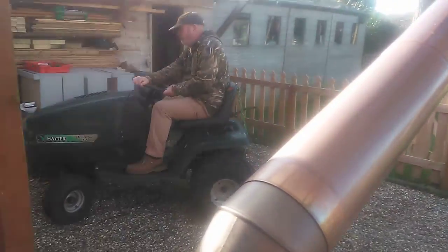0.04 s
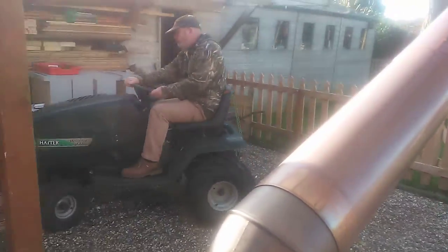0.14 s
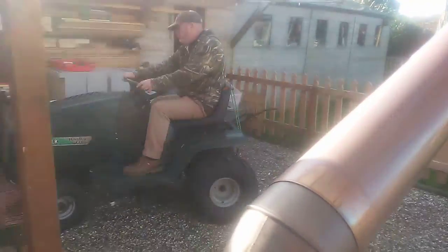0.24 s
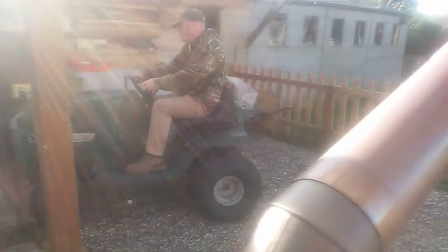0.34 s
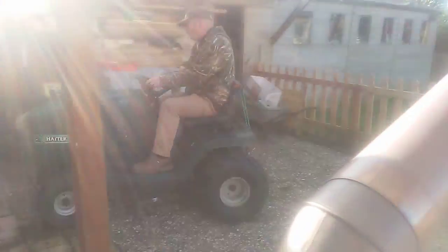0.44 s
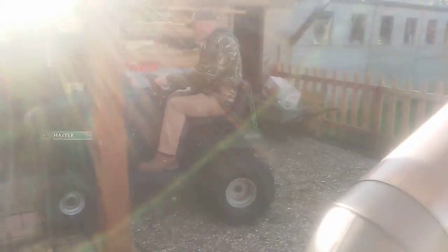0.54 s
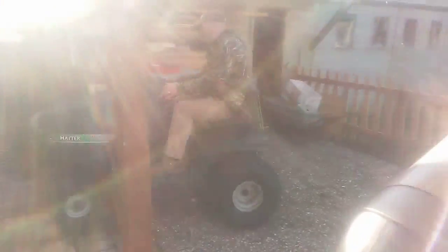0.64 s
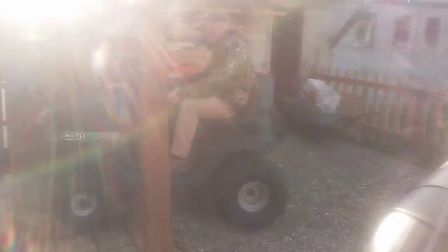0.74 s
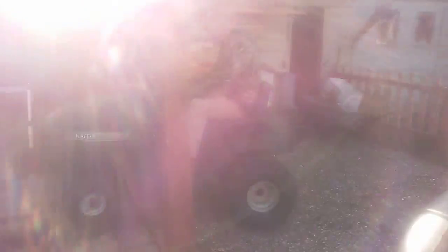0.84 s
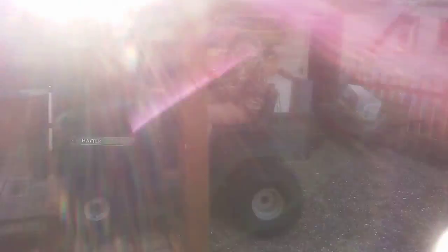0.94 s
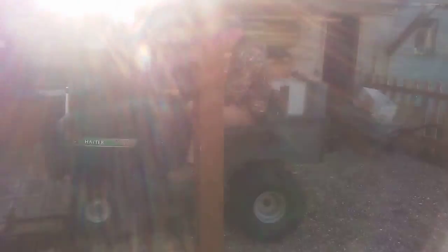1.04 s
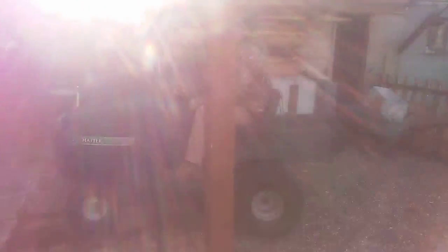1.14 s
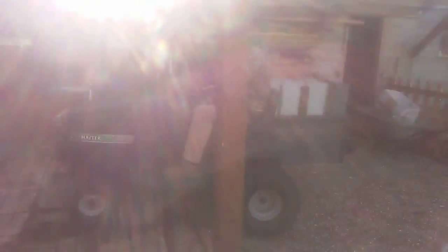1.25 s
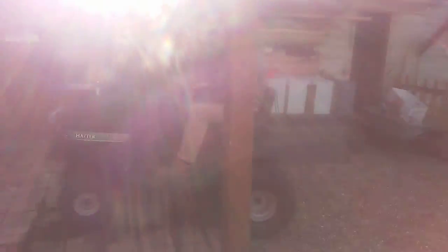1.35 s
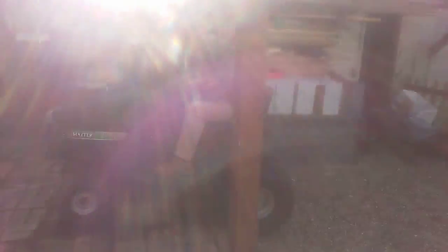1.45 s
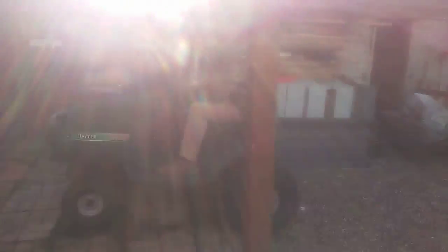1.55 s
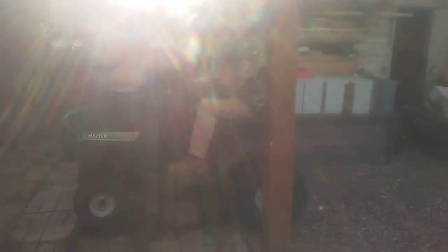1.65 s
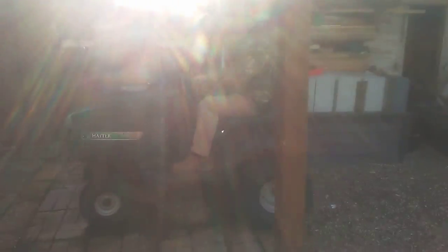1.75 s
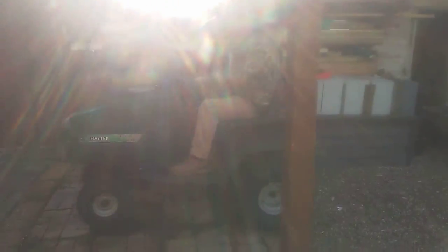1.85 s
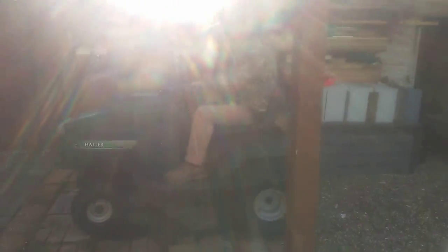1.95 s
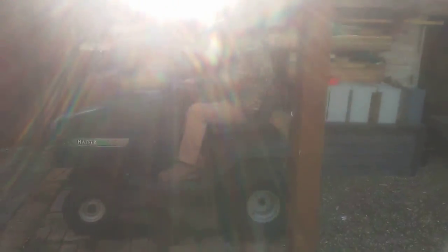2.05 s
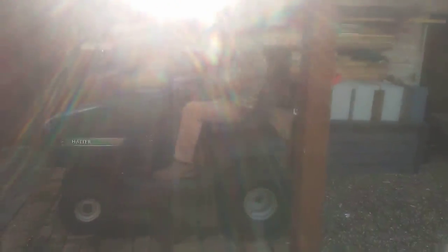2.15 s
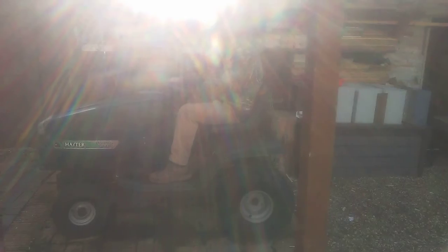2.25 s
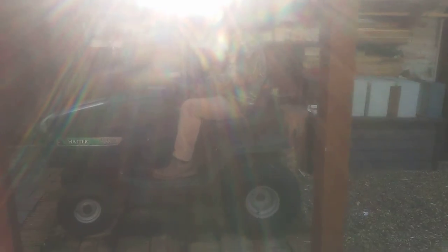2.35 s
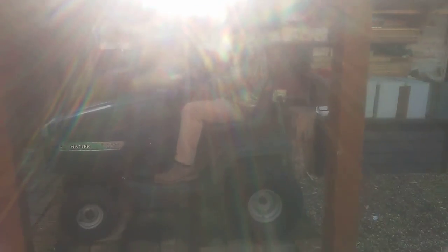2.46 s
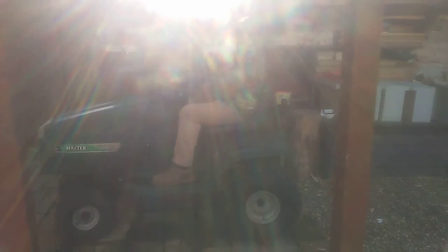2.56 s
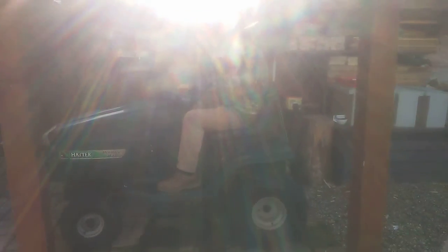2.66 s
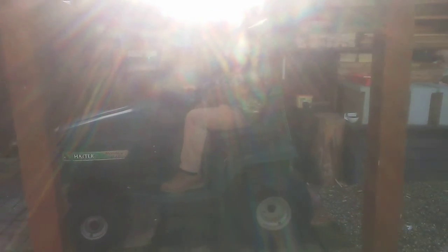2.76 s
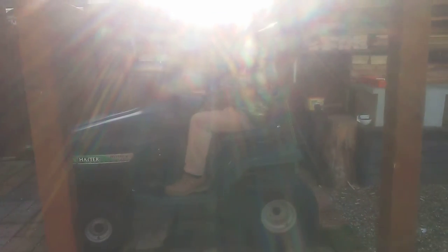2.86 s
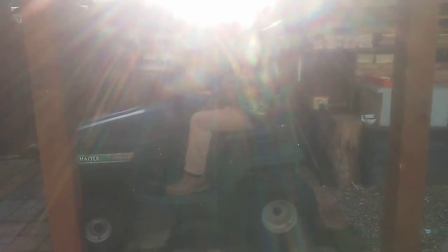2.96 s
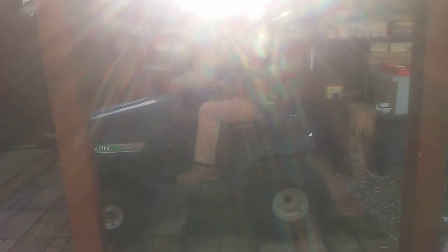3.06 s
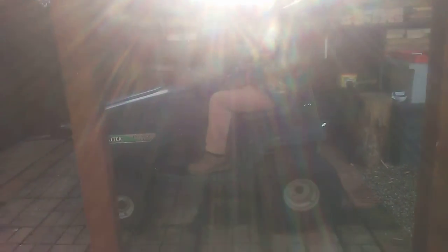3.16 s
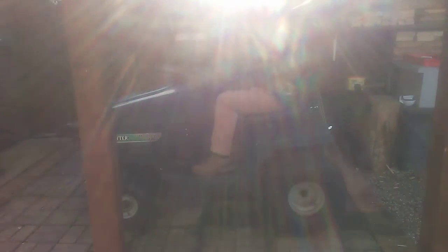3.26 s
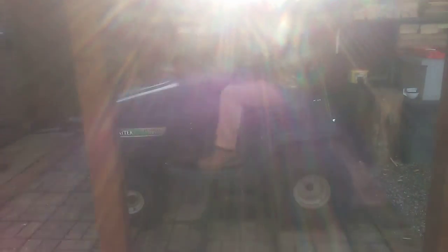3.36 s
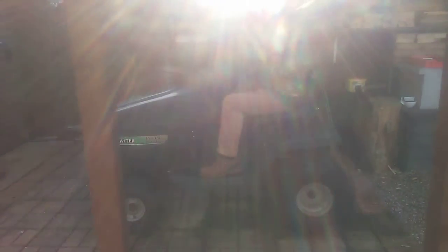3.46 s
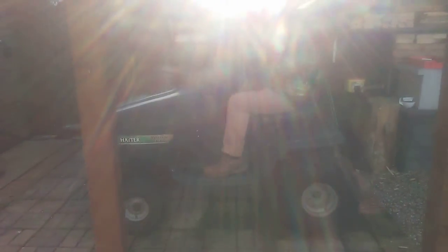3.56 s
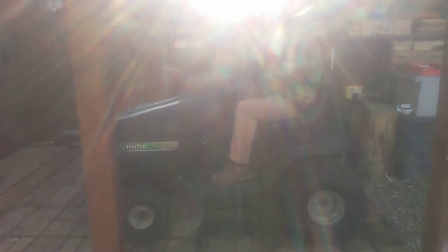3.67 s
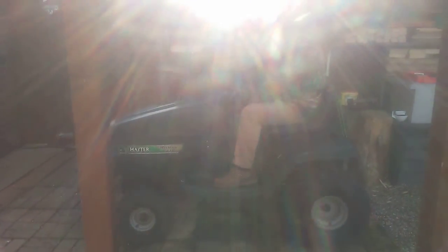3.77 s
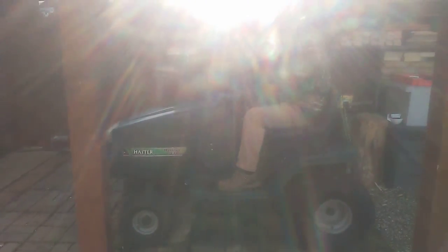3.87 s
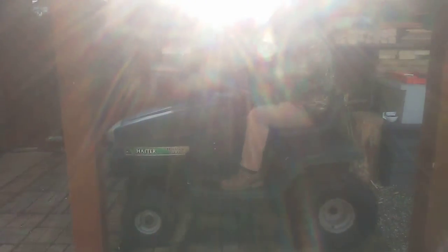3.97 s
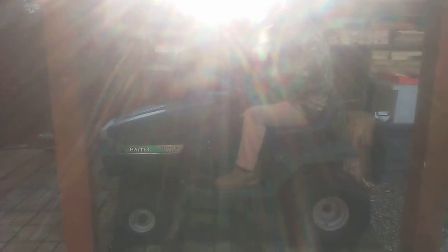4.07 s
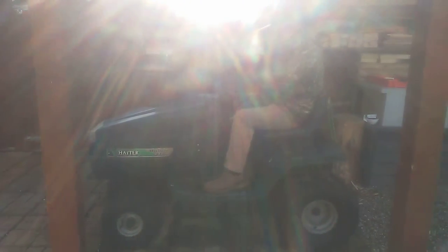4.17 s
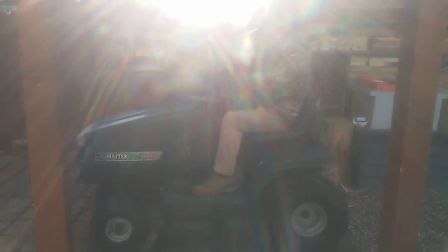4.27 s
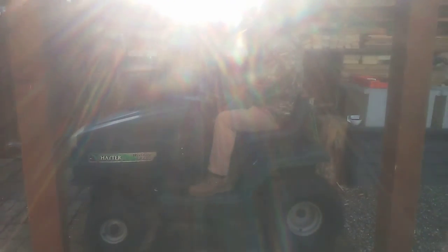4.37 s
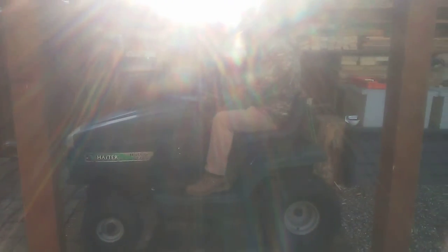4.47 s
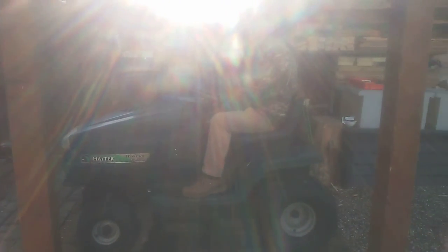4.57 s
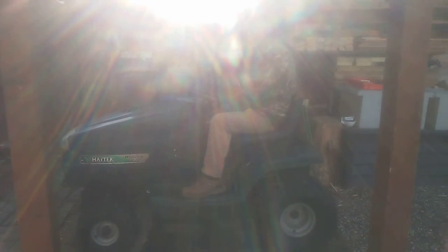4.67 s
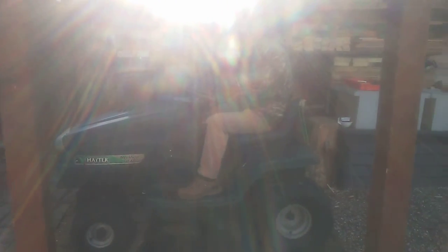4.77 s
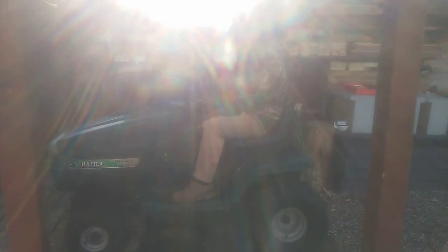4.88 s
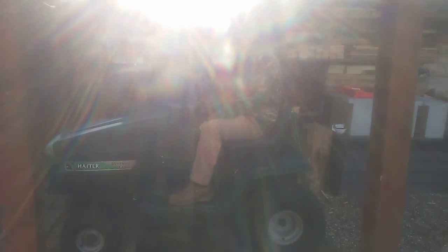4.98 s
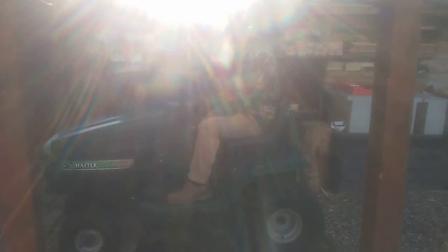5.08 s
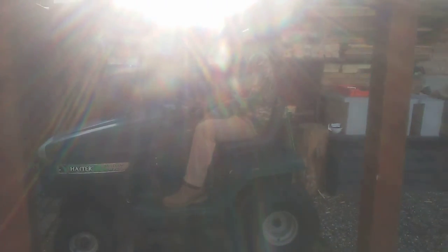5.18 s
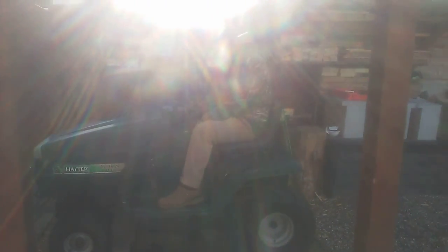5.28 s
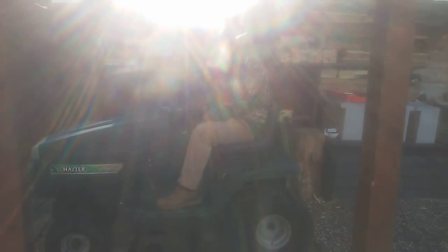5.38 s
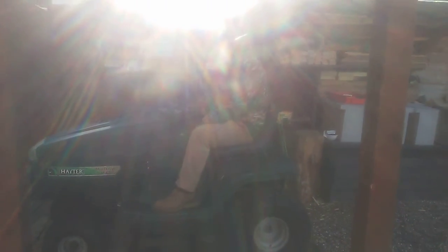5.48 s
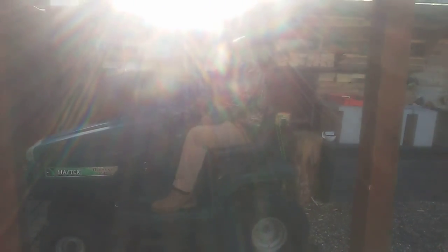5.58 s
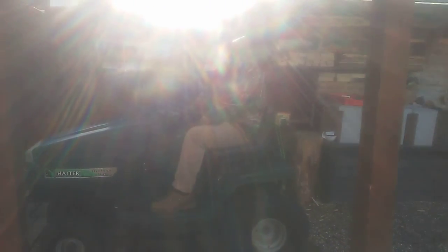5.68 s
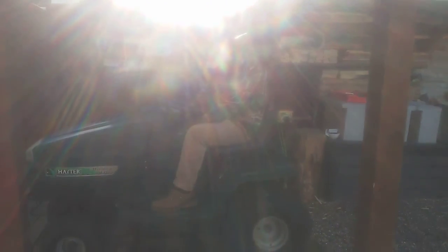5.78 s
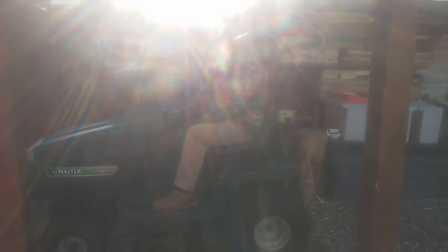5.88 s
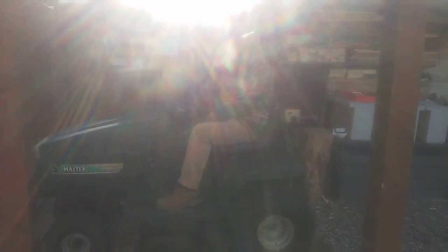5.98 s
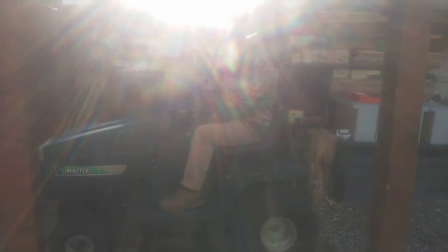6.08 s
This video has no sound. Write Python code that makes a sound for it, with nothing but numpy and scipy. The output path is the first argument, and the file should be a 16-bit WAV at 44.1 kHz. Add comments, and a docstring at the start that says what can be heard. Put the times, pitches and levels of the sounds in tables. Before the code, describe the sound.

A ride-on mower runs a few metres away in a shelter with a gravel floor, with a fast exhaust throb, bright valve ticks and a wavering drone. A sharp, high metal squeak comes at about 0.4 seconds. Gravel crunches at 0.6 seconds and again around 1.3 to 1.5, with two dull stone knocks. The engine slows at about 1.5 seconds, and its beat almost drops out until 2.1, when it returns as a quieter idle. A quick run of crunches follows until 2.5 seconds, and a stone snaps at 3.3. The biggest crunch comes at about 4 seconds, just after a very faint second squeak. From about 2 seconds the engine noise fades into a thin, watery warble with spells of tinny ringing, as if noise suppression were working on it. The soft idle continues to about 6 seconds, with a few small stone clicks and a faint hiss.

```python
"""In a shelter with a gravel floor, a ride-on mower rolls in, slows and idles a few metres away.
Each firing of the engine makes the silencer ring. Valves tick, the air intake drones, and the
engine noise fades within seconds to a thin, patchy warble, as noise suppression sets in. Stones
crunch and snap under tyres and feet, a metal part squeaks twice, and a soft hiss lies beneath."""
import sys
import numpy as np
from scipy import signal
from scipy.io import wavfile
from scipy.ndimage import uniform_filter1d

SR = 44100
rng = np.random.default_rng(int(sys.argv[2]) if len(sys.argv) > 2 else 0)


def transcribe(signal):
    """Save signal, clipped to [-1, 1], as a 16-bit WAV file at the path in sys.argv[1]."""
    frames = np.atleast_2d(signal).T
    limited = np.clip(frames, -1, 1)
    pcm = np.round(limited * 32767).astype(np.int16)
    wavfile.write(sys.argv[1], SR, pcm)


N = 270322
T = np.arange(N) / SR
TOP_HZ = 15700  # sound above this pitch is cut


def undb(db):
    """Turn decibels into a gain to multiply by."""
    return 10 ** (np.asarray(db) / 20)


def unit(x):
    """Scale a signal to an average power of 1."""
    return x / np.sqrt(np.mean(x ** 2))


def curves(table, t):
    """Read a table's columns at the times t, gliding between rows."""
    s, *columns = np.transpose(table)
    return [np.interp(t, s, c) for c in columns]


def spectrum(points, hz):
    """Read a table of pitch_hz, level_db at the pitches hz."""
    pitches, db = np.transpose(points)
    return np.interp(np.log(hz + 1), np.log(pitches), db)


def hump(x, centre, width):
    """A flat-topped hill in pitch or time: 1 at the centre, steep at the sides."""
    return 1 / (1 + ((x - centre) * 2 / width) ** 4)


def ring(x, hz, width):
    """Pass a sound twice through a resonance, so it rings near one pitch."""
    b, a = signal.iirpeak(hz, hz / width, fs=SR)
    return signal.lfilter(b, a, signal.lfilter(b, a, x))


def colour(x, gain_db):
    """Turn each pitch up or down over time, as gain_db(hz, s) says."""
    frames = dict(nperseg=1024, noverlap=768)
    hz, s, bands = signal.stft(x, SR, **frames)
    return signal.istft(bands * undb(gain_db(hz[:, None], s[None])), SR, **frames)[1][:N]


def wander(size):
    """A random wobble, smoothed over size samples."""
    return unit(uniform_filter1d(uniform_filter1d(rng.standard_normal(N), size), size))


def gates(count, s, share, blip_s=.04, streak_s=.16, streaky=0.87):
    """Random switches, open (1) for about a share of the time and otherwise shut (0)."""
    chance = 0
    for hold_s, weight in ((blip_s, 1), (streak_s, streaky)):
        hold_frames = max(int(hold_s / s[0, 1]), 1)
        part = uniform_filter1d(rng.standard_normal((count, s.size)), hold_frames, axis=1)
        chance = chance + weight * part / part.std()
    threshold = 2.85 * (.5 - np.clip(share, 0, 1))
    return np.clip((chance / chance.std() - threshold) / 0.76 + .5, 0, 1)


def hiss(level_db=-49.5):
    """A smooth hiss under everything; its low end dips while the throttle is shut."""
    # tone of the hiss: pitch_hz, level_db
    tone = [(88, -42.5), (150, -14), (268, 2.5), (359, -0.5), (1320, -11), (1760, -24), (2100, -60.5),
            (5760, -36), (9730, -47), (15500, -23)]
    # dip of the low end: time_s, gain_db
    lull = [(1.5, 0), (1.6, -12), (2.06, -9), (2.11, 2)]
    noise = colour(rng.standard_normal(N), lambda hz, s: spectrum(tone, hz) + curves(lull, s)[0] * (hz < 420))
    return undb(level_db) * unit(noise)


def squeaks():
    """Metal sticks and slips, making short, unsteady whistles."""
    # squeaks: start_s, length_s, pitch_hz, level_db, roughness_rad, fade_steepness
    whistles = [(0.429, 0.096, 6770, -11, 1.5, 1.1), (3.866, 0.17, 10750, -40, 0.45, 2.2)]
    out = np.zeros(N)
    for start, length, hz, db, rough, steep in whistles:
        age = (T - start) / length
        shape = np.clip(age * 12, 0, 1) * np.clip(1 - age, 0, 1) ** steep
        flutter = wander(size=130)
        phase = 2 * np.pi * hz * T + rough * flutter
        octave = undb(-27) * np.sin(2 * phase) * (2 * hz < TOP_HZ)
        out += undb(db) * shape * (1 + 0.56 * rough * flutter) * (np.sin(phase) + octave)
    return out


def warble(hz, s, boost_db, extra_share, scattered_bands=40, width_hz=129, share=0.17):
    """Boost in dB for narrow bands that flicker on and off and drift, giving a watery sound."""
    # flickering bands: pitch_hz, width_hz, share_of_time (0-1)
    main_bands = [(678.4, 106, 0.13), (892, 92, 0.14), (1127, 79, 0.17), (1295, 92, 0.04), (1450, 64, 0.16),
                  (2057, 123, 0.31), (2410, 77, 0.22), (2723, 90, 0.36), (2980, 116, 0.27),
                  (3453, 104, 0.38), (3767, 77, 0.45), (4128, 102, 0.33), (4460, 67, 0.49),
                  (4800, 83, 0.26), (5150, 140, 0.4), (5530, 90, 0.2), (6100, 144, 0.64), (6670, 150, 0),
                  (7680, 73, 0.67), (8420, 190, 0.3), (9130, 84, 0.25), (9930, 75, 0.68),
                  (10940, 210, 0.33), (11600, 340, 0.4), (12800, 200, 0.3)]
    scattered_hz = np.linspace(800, 13000, scattered_bands) + 120 * rng.standard_normal(scattered_bands)
    bands = main_bands + [(pitch, width_hz, share) for pitch in scattered_hz]
    pitches, widths, shares = np.transpose(bands)[:, :, None]
    switches = gates(len(bands), s, shares + extra_share)
    drift = uniform_filter1d(rng.standard_normal(switches.shape), size=40, axis=1)
    centres = pitches + .025 * np.minimum(pitches, 3000) * drift / drift.std()
    gain = sum(hump(hz, centre, width) * gate for centre, width, gate in zip(centres, widths, switches))
    return 20 * np.log10(1 + gain * np.maximum(undb(boost_db) - 1, 0))


def stone_snaps():
    """Single stones snap, each a short burst of noise around one pitch."""
    # snaps: start_s, peak_db, pitch_hz, width_hz, fade_s (time to fall 60 dB)
    snaps = [(1.372, -17, 330, 120, .12), (1.445, -14, 320, 120, .14), (2.424, -19, 400, 260, .15),
             (3.268, -14, 4000, 1300, .025), (3.2684, -33, 14500, 5000, .006), (5.225, -29, 580, 200, .05),
             (5.474, -24, 1850, 300, .07), (6.006, -29, 2100, 400, .06)]
    out = np.zeros(N)
    for start, db, hz, width, fade in snaps:
        shape = (T >= start) * undb(-60 * np.clip(T - start, 0, None) / fade)
        burst = ring(rng.standard_normal(N) * shape, hz, width)
        out += undb(db) * burst / np.abs(burst).max()
    return out


def gravel(grain_db=2.3, lumps_db=1.3):
    """Crushed stones make dense, uneven clicks that swell and die with each crunch."""
    # crunches: start_s, level_db, rise_ms, fade_s (to fall 60 dB), body_db, treble_db, treble_fade_s
    crunches = [(0.632, -2, 2.1, 0.48, 9, -4.5, 0.37), (1.2976, -6.5, 3.2, 0.4, -6, 5, .25),
                (1.467, -8.5, 1.86, 0.83, 4, -3, 0.22), (2.0975, -8, 7.9, 0.4, -3, -0.5, 0.19),
                (2.17, 0, 4.2, 0.39, -0.5, -1.5, 0.23), (2.242, -4, 5, 0.2, 4.5, 1, 0.21),
                (2.311, -5, 5.7, 0.13, -9, -4, 0.2), (2.3715, -13.5, 6.5, 0.5, -14, -6, 0.24),
                (2.4247, -8, 5.1, 0.07, -17, -5, 0.17), (4.012, -6, 42, 0.45, 3, 9, 0.31),
                (4.031, 3, 55, 0.3, 6, 6, 0.22), (4.056, -2, 6, .25, 7, 3, .15),
                (4.083, 0, 4, .18, 6, 0, .12), (4.12, -1, 4, .2, 4, -2, .12),
                (4.1, 5, 22, 0.2659, 1, -5.5, 0.33), (4.135, -4, 15, 0.37, -3, 0.5, 0.21)]
    # tone of the stones: pitch_hz, level_db
    tone = [(88, -82), (150, -50), (182, -51), (258, -10.5), (519, -12), (668, -13), (877, -13), (1200, -7),
            (2450, -5.5), (4220, -7), (7000, -17.5), (11500, -29), (15500, -39)]
    low_power, mid_power, high_power = np.zeros((3, N))
    for start, db, rise_ms, fade, body_db, treble_db, treble_fade in crunches:
        age = np.clip(T - start, 0, None)
        rise = 1 - np.exp(-age * 1000 / rise_ms)
        low_power += (rise * undb(db + body_db - 60 * age / fade)) ** 2
        mid_power += (rise * undb(db - 60 * age / fade)) ** 2
        high_power += (rise * undb(db + treble_db - 60 * age / treble_fade)) ** 2
    noise = rng.standard_normal(N)
    grains = unit(noise * undb(grain_db * rng.exponential(size=N) + lumps_db * wander(size=250)))
    stone = colour(grains, lambda hz, s: spectrum(tone, hz) + warble(hz, s, 7.4, extra_share=0.16))
    body = signal.sosfiltfilt(signal.butter(2, 950, fs=SR, output="sos"), stone)
    top = signal.sosfiltfilt(signal.butter(2, 5000, "high", fs=SR, output="sos"), stone)
    middle = stone - body - top
    return np.sqrt(low_power) * body + np.sqrt(mid_power) * middle + np.sqrt(high_power) * top


def count_firings():
    """A running count of the engine's firings; one falls on each whole number."""
    # engine speed: time_s, firings_per_s
    speed = [(0, 20.35), (1.24, 21.31), (1.56, 15.24), (2.06, 16.45), (2.15, 14.73), (3.35, 15.43),
             (3.91, 14.43), (4.1, 15.28), (6.13, 15.26)]
    return np.cumsum(curves(speed, T)[0]) / SR - .59


def engine_tones(waver_db=2.6, waver_hz=4.0, edge_s=0.05):
    """Clear engine tones stand out for a while, gliding and wavering."""
    # tones: start_s, length_s, first_hz, last_hz, level_db
    tones = [(0.03, .27, 513, 521, -22), (0.02, .25, 560, 562, -24), (0.0, .62, 332, 328, -29),
             (.15, .5, 287, 291, -28), (.15, .42, 390, 394, -31), (.45, .17, 565, 570, -24),
             (.68, .64, 528, 531, -25), (1.08, .3, 432, 420, -30), (1.3, .4, 603, 592, -28),
             (.72, .8, 232, 228, -32), (.6, .8, 172, 178, -46), (1.55, .15, 218, 212, -43),
             (1.83, .1, 810, 715, -30), (1.975, .05, 800, 790, -27), (2.06, .14, 800, 775, -32)]
    out = np.zeros(N)
    for start, length, first_hz, last_hz, db in tones:
        hz = np.interp(T, [start, start + length], [first_hz, last_hz]) + waver_hz * wander(size=1500)
        shape = np.clip(np.minimum(T - start, start + length - T) / edge_s + .5, 0, 1)
        out += undb(db + waver_db * wander(size=800)) * shape * np.sin(2 * np.pi * np.cumsum(hz) / SR)
    return out


def bonnet_ring(firings, pitch_hz=1785, width_hz=130, edge_s=0.052, fade_db=9.5):
    """Vibration makes the bonnet ring in tinny spells, while other pitches flicker in and out."""
    # spells of bonnet ringing: start_s, length_s, relative_db
    spells = [(1.812, 0.29, -28), (2.104, 0.15, -24), (2.31, 0.19, -21.5), (2.566, 0.26, -36),
              (2.85, 0.55, -33), (3.5, 0.31, -27.5), (3.99, .08, -32.5), (4.064, 0.26, -24.5),
              (4.374, 0.29, -32), (4.687, 0.16, -31.5), (4.854, 0.31, -28.5), (5.197, 0.38, -34),
              (5.644, 0.25, -34), (5.998, 0.12, -37)]
    # other bands that ring briefly: start_s, length_s, pitch_hz, width_hz, relative_db
    streaks = [(1.8, 0.067, 930, 200, -26), (1.88, 0.17, 582, 115, -27.5), (2.03, .05, 710, 120, -25),
               (1.83, .11, 760, 200, -26), (1.8, .28, 3450, 200, -31), (1.83, .22, 2950, 200, -33),
               (1.9, .17, 1950, 350, -31), (1.825, 0.25, 1186, 170, -27), (0.057, 0.16, 5170, 230, -31),
               (0.029, .33, 7600, 330, -42), (.06, 0.23, 6200, 220, -42), (3.275, 0.065, 4560, 1700, -38),
               (3.96, 0.045, 8200, 1400, -53), (4.03, 0.066, 665, 200, -21), (4.11, 0.059, 770, 250, -21),
               (2.443, 0.24, 460, 78, -30), (2.3, 0.075, 1510, 120, -30), (2.36, 0.11, 1385, 130, -28.5),
               (2.3, 0.14, 2130, 120, -28), (2.3, 0.2, 3700, 300, -30), (2.52, .13, 3600, 260, -33),
               (2.39, 0.49, 2594, 175, -32), (2.885, 0.25, 2500, 150, -31), (3.3, 0.43, 2656, 134, -33),
               (3.146, 0.15, 678, 125, -31), (3.67, 0.062, 595, 110, -30), (2.5, 0.15, 900, 130, -33.5),
               (3.464, 0.27, 519, 98, -33), (4.19, 0.37, 6020, 330, -43), (4.615, .4, 5990, 400, -45),
               (4.38, 0.79, 2120, 126, -39), (3.93, 1, 6680, 115, -46.5), (3.83, 0.065, 900, 110, -32),
               (2.66, .1, 1430, 110, -33), (3.1, 0.14, 1400, 130, -32), (4.42, 0.15, 1500, 110, -37),
               (4.62, .1, 880, 110, -36), (4.65, 0.068, 1150, 100, -35), (4.77, .04, 720, 110, -34),
               (4.88, 0.048, 780, 110, -32.5), (5.01, 0.054, 890, 110, -35), (5.21, .25, 1480, 110, -41),
               (5.72, 0.16, 1495, 110, -41), (5.93, .05, 710, 110, -34.5), (6.07, .04, 950, 110, -38)]

    def gain_db(hz, s):
        loudness = 0
        for start, length, db in spells:
            edges = np.clip(np.minimum(s - start, start + length - s) / edge_s + .5, 0, 1)
            loudness += edges * undb(db - fade_db * np.clip((s - start) / length, 0, 1))
        sway_hz = 22 * np.interp(s, T, wander(size=2500))
        flicker = undb(12 * (gates(1, s, share=0.6, streaky=.3) - .75))
        gain = hump(hz, pitch_hz + sway_hz, width_hz) * loudness * flicker
        streak_flickers = undb(10 * (gates(len(streaks), s, share=0.54) - 1))
        for (start, length, centre, width, db), gate in zip(streaks, streak_flickers):
            gain += hump(hz, centre, width) * undb(db) * hump(s, start + length / 2, length) * gate
        return 20 * np.log10(gain + 1e-9) + 21
    throb = 1 + 0.1 * np.cos(2 * np.pi * (firings - .95))
    return colour(throb * rng.standard_normal(N), gain_db)


def intake_drone(firings, firing_share=0.395):
    """Firing overtones and rushing air feed a drone that sinks as the engine slows."""
    # resonance of the air intake: time_s, pitch_hz, width_hz, relative_db
    drone = [(0, 547, 90, -29), (.28, 547, 90, -31), (.42, 615, 130, -24), (.7, 637, 130, -20.5),
             (.85, 626, 198, -25), (1.25, 604, 179, -24.5), (1.45, 620, 110, -30), (1.65, 590, 150, -29),
             (1.69, 505, 120, -25), (1.78, 495, 130, -31), (1.85, 483, 110, -49)]
    overtones = sum(np.sin(2 * np.pi * k * firings + 10 * rng.standard_normal()) for k in range(20, 40))
    air = ring(rng.standard_normal(N), hz=597, width=450)

    def gain_db(hz, s):
        centre, width, db = curves(drone, s)
        band = hump(hz, centre, width) * (s < drone[-1][0])
        return 20 * np.log10(band + 1e-9) + db + 10 * np.log10(1300 / width)
    return colour(firing_share * unit(overtones) + (1 - firing_share) * unit(air), gain_db)


def hollows(hz, s):
    """Cuts in dB where the engine's roar thins for a while."""
    # thinned bands: start_s, length_s, pitch_hz, width_hz, gain_db
    dips = [(.33, .32, 4800, 250, -12), (.7, 0.53, 4850, 300, -5), (0, .42, 6750, 700, -8),
            (.8, 0.24, 6350, 500, -8), (1.56, .25, 810, 160, -8), (2.072, .09, 1020, 250, -14),
            (2.09, .08, 620, 200, -14), (.06, .37, 5800, 250, -10), (1.0, .3, 6600, 350, -8),
            (1.85, .24, 4650, 500, -8), (1.88, .2, 2600, 300, -8), (2.3, .17, 1000, 500, -8)]
    return sum(db * hump(hz, centre, width) * hump(s, start + length / 2, length)
               for start, length, centre, width, db in dips)


def valves(firings, fade_cycles=0.41, scatter_db=2.5):
    """The valves give a bright tick once a firing, never quite on time."""
    # loudness of the ticks: time_s, level_db
    levels = [(0, -40.5), (.7, -38.5), (1.45, -45), (1.7, -52), (6.13, -77)]
    cycle = firings - .82 + 0.074 * wander(size=2000)
    size = undb(scatter_db * rng.standard_normal(200))[np.floor(cycle).astype(int) + 2]
    ticks = size * np.exp(-(cycle % 1) / fade_cycles) * rng.standard_normal(N)
    bright = unit(ring(ticks, hz=5400, width=5200))
    return colour(bright * undb(curves(levels, T)[0]), hollows)


def clatter(firings):
    """Engine noise that throbs once a firing and breaks into warbling patches."""
    # loudness of the clatter: time_s, relative_db
    levels = [(0, -15.5), (.2, -13), (.66, -13), (.8, -16.5), (1.3, -13.5), (1.5, -16.5), (1.75, -22),
              (1.9, -20), (2.0, -21), (2.07, -30), (2.3, -33), (2.5, -29), (2.86, -27.5), (3.15, -31.5),
              (3.5, -29.5), (3.63, -19.5), (3.76, -34), (3.96, -39.5), (4.29, -33.5), (4.4, -37),
              (6.13, -38.5)]
    # tone of the clatter: pitch_hz, level_db
    tone = [(88, -62), (150, -63), (205, -21), (274, -11.5), (366, -5), (656, -4), (948, -3.5),
            (1290, -3.5), (4480, -9), (5990, -18), (6860, -25.5), (7410, -24), (15500, -45)]
    # changing balance of low and high: time_s, boom_db, treble_db
    balance = [(0, 6.5, -13.5), (.8, 1.5, -11.5), (1.0, -0.5, -10), (1.3, 7, -9.5), (1.55, -13, -6.5),
               (2.0, -2, -15), (2.45, -19, -2.5), (2.85, -12, -9.5), (3.25, -11, -3.5), (3.65, -10, -12),
               (4.3, -1, -9.5), (4.7, 12, -2.5), (6.13, 2, -5.5)]
    # how much the flickering bands stand out: time_s, boost_db, extra_share_of_time
    patches = [(0, 6.5, 0.048), (.7, 6, 0.064), (1.3, 7, 0.01), (1.8, 17, 0.026), (2.5, 21, -0.059),
               (3.7, 21.5, -0.026), (4.3, 22.5, -0.091), (6.13, 21, -0.1)]
    throb = 1 + 0.15 * np.cos(2 * np.pi * (firings - 0.94))
    crackle = rng.standard_normal(N) * undb(1.2 * rng.exponential(size=N))

    def gain_db(hz, s):
        boom_db, treble_db = curves(balance, s)
        boost_db, extra_share = curves(patches, s)
        boom = 1 / (1 + (hz / 760) ** 8)
        treble = 1 / (1 + (3900 / (hz + 1)) ** 6)
        tone_db = spectrum(tone, hz) + boom * (boom_db - 2.5) + treble * (treble_db + 6.5)
        warble_db = warble(hz, s, boost_db, extra_share) - 0.64 * boost_db  # quieter between the bands
        return curves(levels, s)[0] + tone_db + warble_db + hollows(hz, s) + 14
    return colour(unit(throb * crackle), gain_db)


def exhaust(firings, idle_hz=15.3, pulling_hz=20.7, lag_cycles=0.4342):
    """Each firing pushes gas through the silencer and rings it, more evenly when the engine pulls."""
    # silencer resonances: pitch_hz, width_hz, level_db, early_ms, change_under_load_db
    silencer = [(113, 34, -23.5, 34, -1), (207.9, 54, -2.5, 24.32, -2), (266, 61, -2, 18.95, -4),
                (320.3, 60, -12.5, 14.49, 6.5)]
    # exhaust beat, which drops away while the throttle is shut: time_s, upper_db, lower_db
    beat = [(0, -28, -38.5), (.3, -22.5, -30.5), (.7, -23, -31.5), (.95, -36.5, -36.5), (1.26, -29.5, -33),
            (1.48, -31, -44), (1.6, -65, -51), (2.03, -67.5, -79), (2.1, -35, -46), (2.5, -39, -46),
            (3.3, -48, -43), (4.0, -37, -44.5), (4.3, -41.5, -47), (5.4, -38, -42.5), (6.13, -37.5, -43.5)]
    firing_hz = np.gradient(firings) * SR
    load = np.clip((firing_hz - idle_hz) / (pulling_hz - idle_hz), 0, 1)
    upper_db, lower_db = curves(beat, T)
    out = 0
    for k, (hz, width, db, early_ms, load_db) in enumerate(silencer):
        upper = k >= 2
        level_db, scatter_db = (upper_db, 2.6) if upper else (lower_db, 2.0)
        second_push = 0.35 * load * upper  # under load a weaker push follows in mid-cycle
        pushes = np.zeros(N)
        for size, shift in ((np.ones(N), 0), (second_push, lag_cycles)):
            at = np.flatnonzero(np.diff(np.floor(firings - shift)))
            uneven = undb(scatter_db * (1 - 0.58 * load[at]) * rng.standard_normal(200)[:len(at)])
            pushes[np.clip(at - int(early_ms * SR / 1000), 0, None)] += size[at] * uneven
        swell = ring(ring(pushes, hz, width), hz, width)  # chambers in a row soften each push
        out += (-1) ** k * unit(swell) * undb(db + level_db + load_db * load)
    return out


def scene():
    """Mix the engine, stones, squeaks and hiss into one channel."""
    firings = count_firings()
    engine = exhaust(firings) + clatter(firings) + valves(firings)
    engine += intake_drone(firings) + bonnet_ring(firings) + engine_tones()
    return (engine + gravel() + stone_snaps() + squeaks() + hiss())[None]


def record(dry, knee=4):
    """Round off the loudest peaks, then cut the deep bass and the highest treble."""
    bass_cut = signal.butter(6, 85, "high", fs=SR, output="sos")
    top_cut = signal.ellip(12, .2, 60, TOP_HZ, fs=SR, output="sos")
    loud = 1.076 * dry
    rounded = loud / (1 + np.abs(loud) ** knee) ** (1 / knee)
    return signal.sosfilt(top_cut, signal.sosfilt(bass_cut, rounded))


dry = scene()
out = record(dry)
transcribe(out)
```